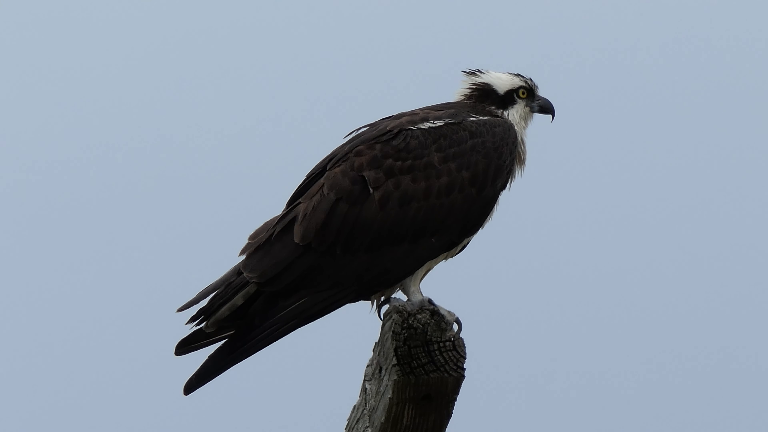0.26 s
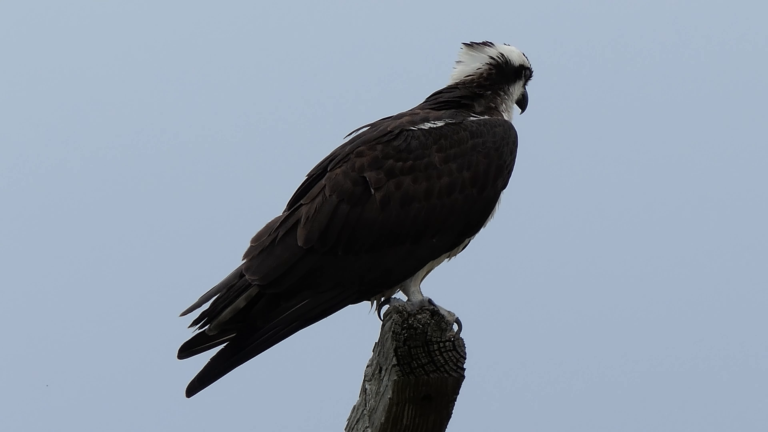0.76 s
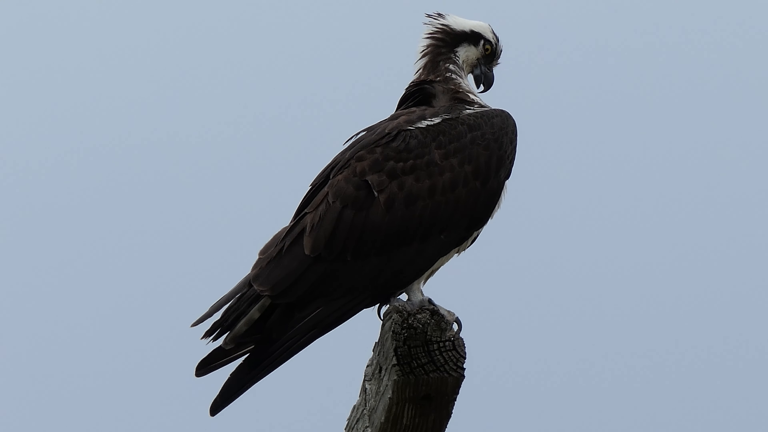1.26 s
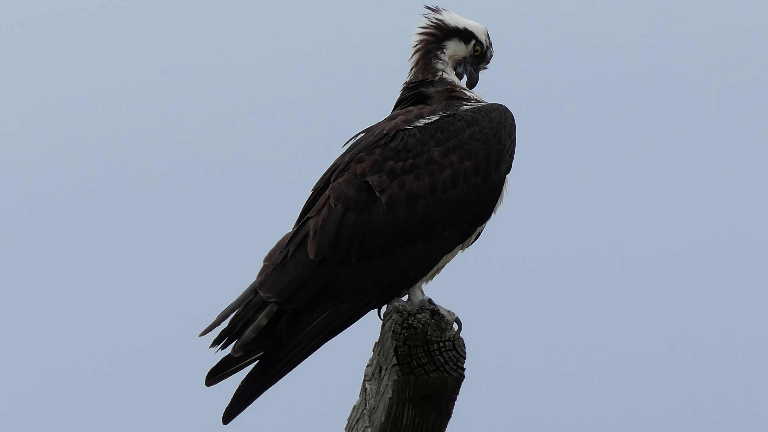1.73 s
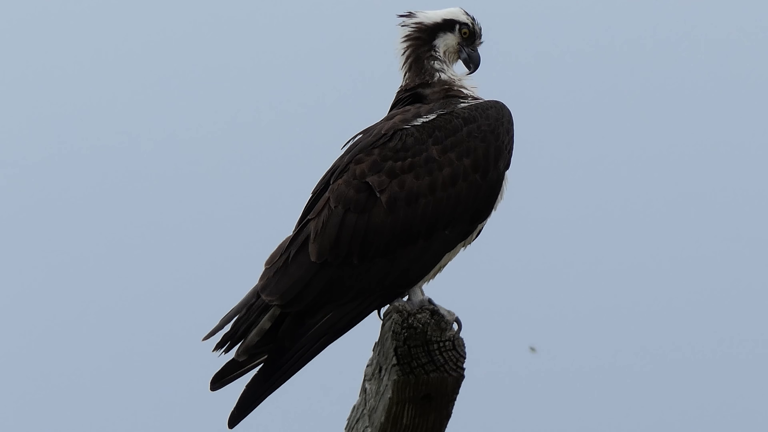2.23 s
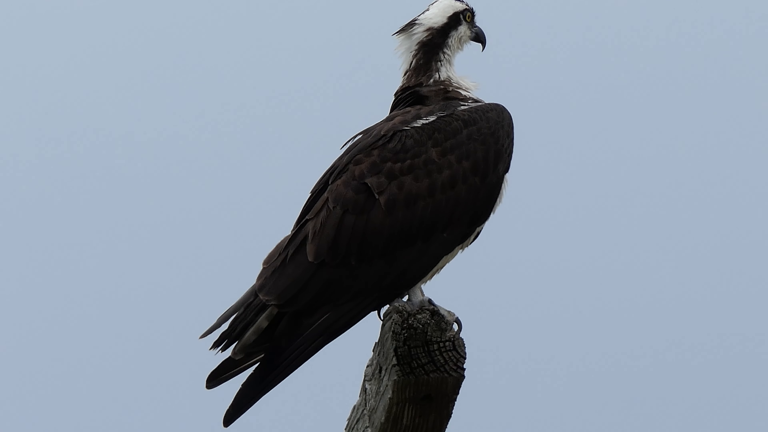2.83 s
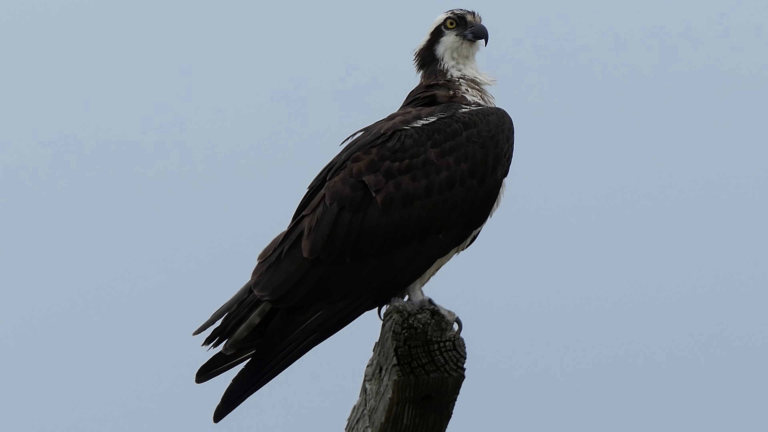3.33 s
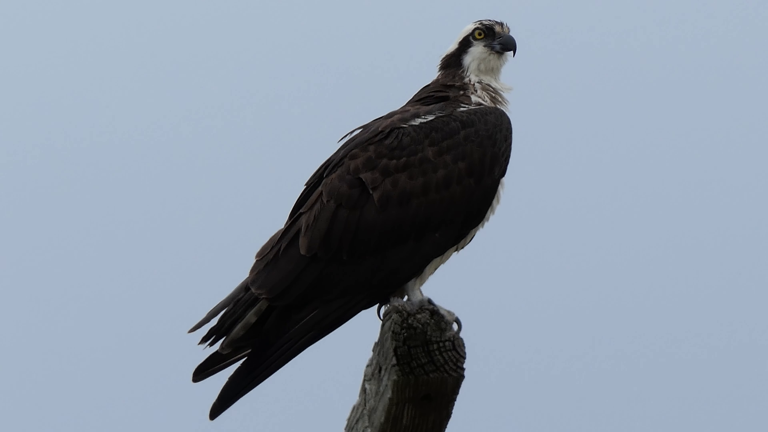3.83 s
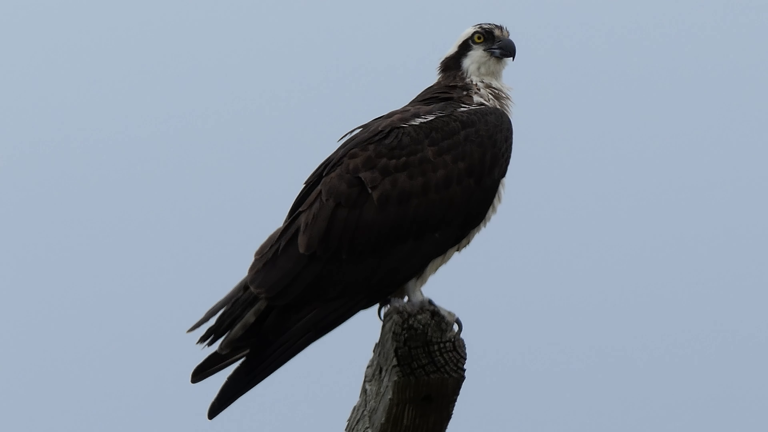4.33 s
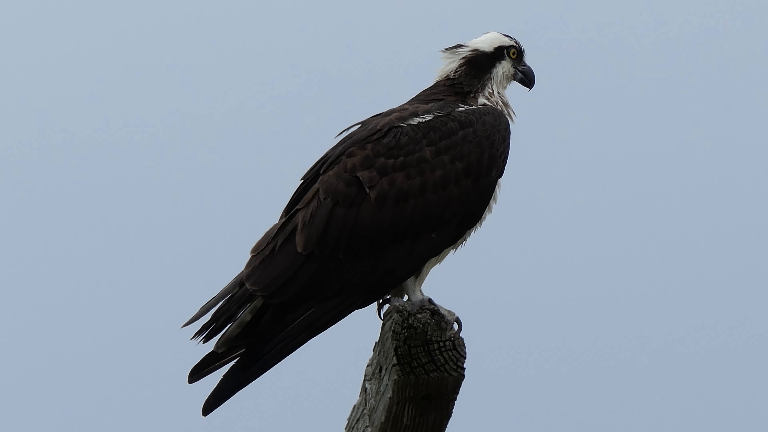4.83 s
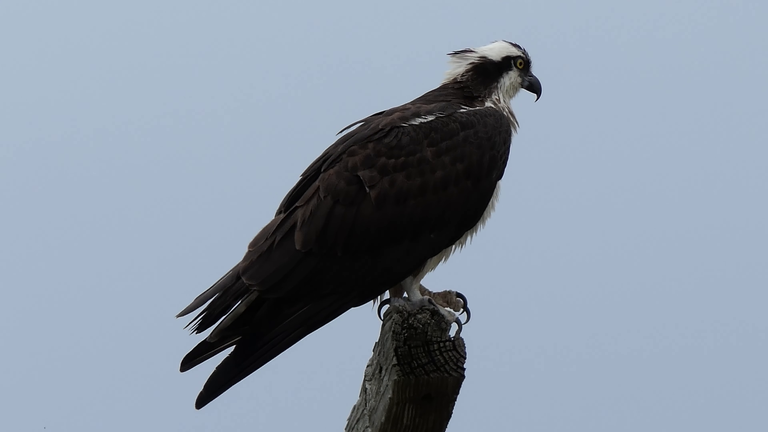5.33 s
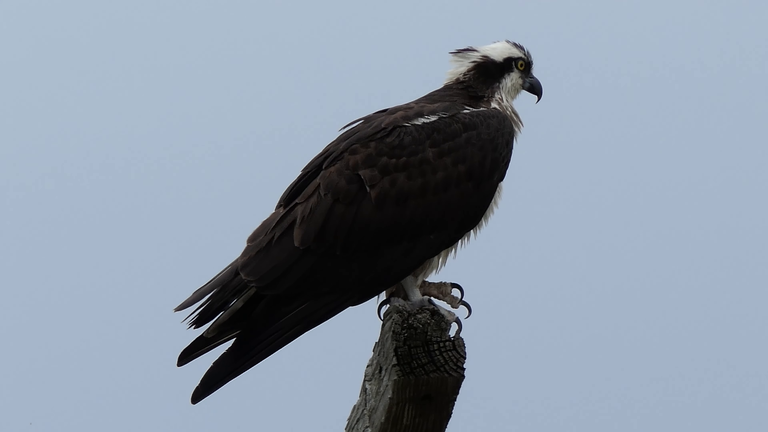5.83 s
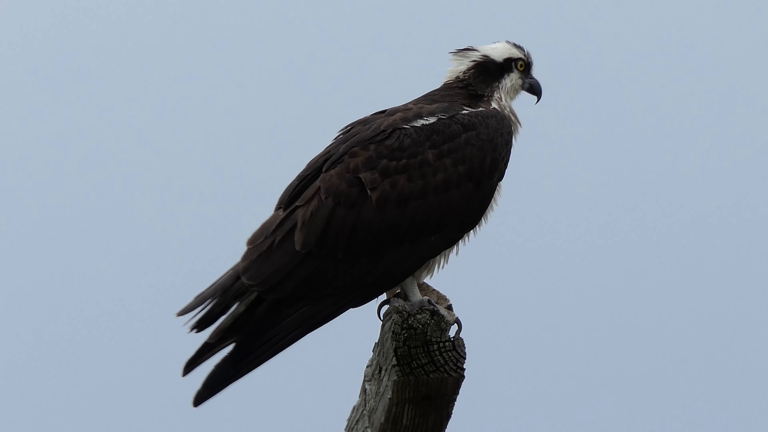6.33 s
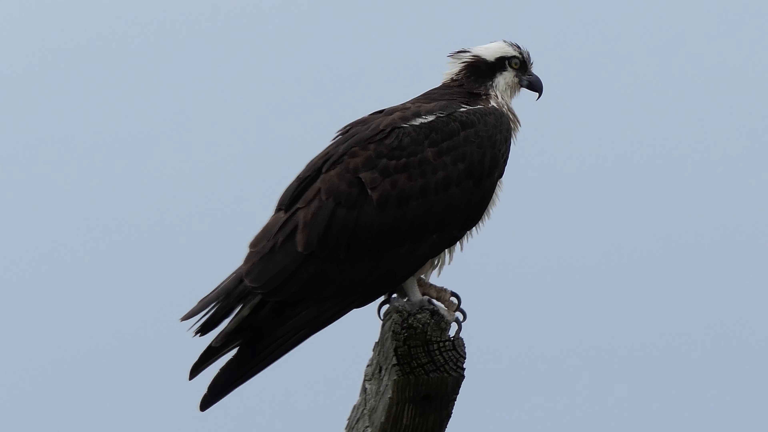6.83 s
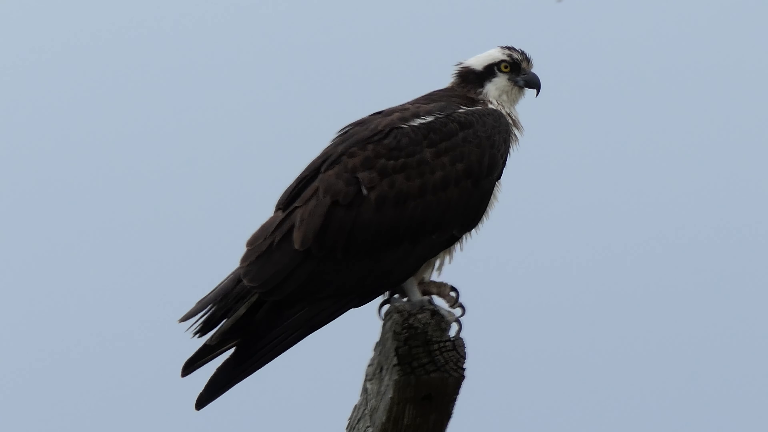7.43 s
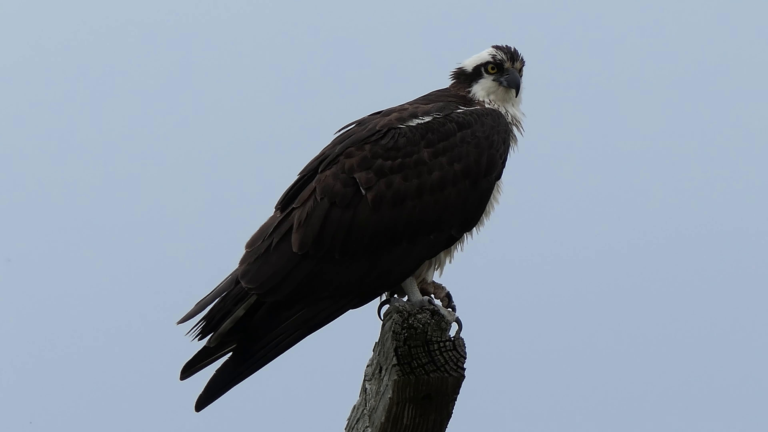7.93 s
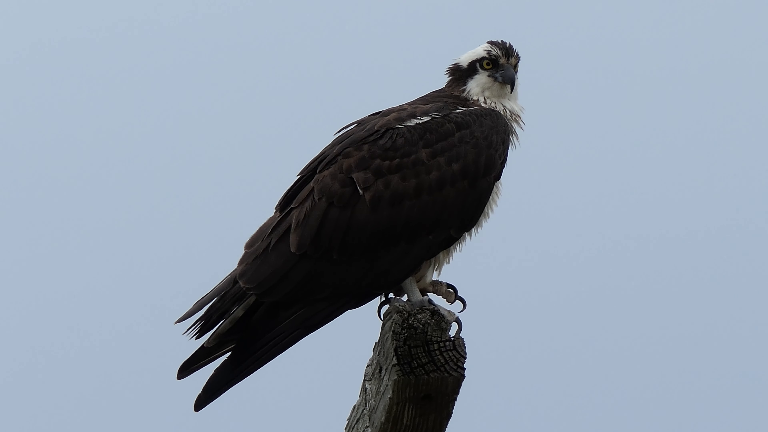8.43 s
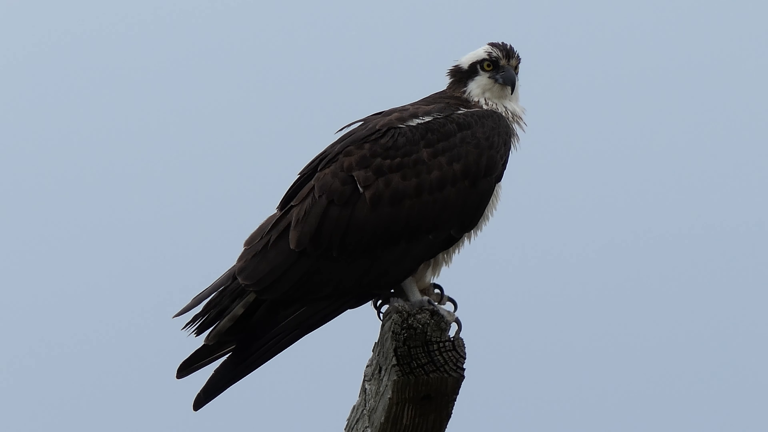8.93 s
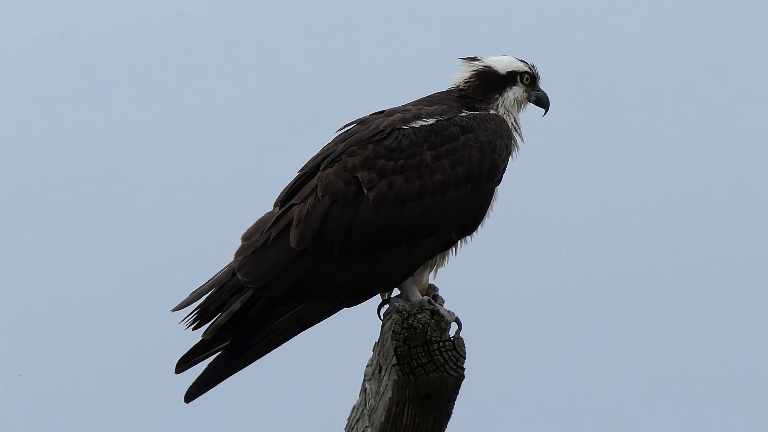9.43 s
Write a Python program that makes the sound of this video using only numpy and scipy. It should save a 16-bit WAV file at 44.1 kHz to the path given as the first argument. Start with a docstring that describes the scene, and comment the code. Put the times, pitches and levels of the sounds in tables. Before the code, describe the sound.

An osprey gives three short whistled chirps dropping in pitch, with dry chacks between, over distant machine hum and one loud steel bang.

```python
"""A large bird whistles three calls: harmonics of a gliding pitch, a quick yelp dropping to a held note.
A smaller bird adds dry chacks, pulses in rasping noise; faint sine peeps glide. The birds echo faintly.
Far off a heavy machine hums on its firing rate and sags under load. A steel part bangs: noise through
ringing resonances. Loose material rumbles down in surges of coloured noise, over low din, air and hiss."""
import sys
import numpy as np
from scipy import signal
from scipy.fft import rfft, irfft, next_fast_len
from scipy.io import wavfile
from scipy.ndimage import map_coordinates

SR = 44100
rng = np.random.default_rng(int(sys.argv[2]) if len(sys.argv) > 2 else 0)


def to_wav(sig):
    """Store sig (one row per channel, or 1-D mono) as 16-bit WAV at the path in sys.argv[1].

    Samples outside -1..1 are clipped; the rate is SR.
    """
    pcm = np.clip(np.atleast_2d(sig), -1, 1) * 32767
    pcm = np.round(pcm).astype(np.int16)
    wavfile.write(sys.argv[1], SR, pcm.T)  # frames by channels


N = 426447
TIME = np.arange(N) / SR


def from_db(db):
    """Decibels to gain."""
    return 10 ** (np.asarray(db) / 20)


def rms_one(x):
    """Scale to unit power."""
    return x / np.sqrt(np.mean(x ** 2) + 1e-20)


def in_time(rows):
    """Interpolate a (time, level) curve at every sample."""
    s, level = np.transpose(rows)
    return np.interp(TIME, s, level)


def at_hz(points, hz):
    """Read a spectrum on a log-frequency axis."""
    f, value = np.transpose(points)
    return np.interp(np.log(hz), np.log(f), value)


def step(x):
    """Smooth step from 0 to 1 around x = 0."""
    return (1 + np.tanh(x / 2)) / 2


def bell(off_hz, width_hz):
    """Bell-shaped peak, 1 at its centre."""
    return np.exp(-(off_hz / width_hz) ** 2)


def drift(rate_hz, t=TIME):
    """Random curve through rate_hz knots a second, joined by straight lines; rms 1."""
    knots = rng.standard_normal(N // 20)
    return rms_one(map_coordinates(knots, [t * min(rate_hz, SR / 21)], order=1))


def resonate(x, hz, width_hz):
    """One two-pole resonance with gain 1 on top."""
    r = np.exp(-np.pi * width_hz / SR)
    b = np.array([1, 0, -1]) * (1 - r * r) / 2
    a = [1, -2 * r * np.cos(2 * np.pi * hz / SR), r * r]
    return signal.lfilter(b, a, x + 1e-18)


def low_pass(x, hz, order):
    """Butterworth low-pass."""
    sos = signal.butter(order, min(hz, SR / 2 - 1), fs=SR, output="sos")
    return signal.sosfilt(sos, x + 1e-18)


def panned(x, left_db):
    """Place a source by its left-right level difference."""
    return x * from_db(np.array([[left_db], [-left_db]]) / 2)


# left-right correlation of diffuse sound: (frequency [Hz], likeness [-1..1])
LIKENESS = [(25, 0.18), (80, 0.98), (200, 0.9), (400, 0.86), (700, 0.72), (1500, 0.55), (3000, 0.63),
            (6000, 0.46), (10000, 0.46), (14000, .15)]


def stereo_noise(spectrum):
    """Coloured noise from all around, its two sides as alike as LIKENESS says; rms 1."""
    size = next_fast_len(N)
    hz = np.maximum(np.arange(size // 2 + 1) * SR / size, 1)
    mid, side = rfft(rng.standard_normal((2, size)))
    alike = np.clip(at_hz(LIKENESS, hz), -1, 1)
    pair = np.sqrt(1 + alike) * mid + np.sqrt(1 - alike) * side * [[1], [-1]]
    return rms_one(irfft(pair * from_db(at_hz(spectrum, hz)), size)[:, :N])


def surroundings(x, t60_s, low_hz, dull_hz):
    """Scattered echoes, different on each side; leaves and twigs throw back the short waves best."""
    t = TIME[:SR]
    band = signal.butter(2, [low_hz, dull_hz], "band", fs=SR, output="sos")
    scatter = signal.sosfilt(band, rng.standard_normal((2, SR)))
    echoes = scatter * from_db(-60 * t / t60_s) * (1 - np.exp(-t / 0.0046))
    response = rms_one(echoes) / np.sqrt(SR)
    return signal.fftconvolve(np.atleast_2d(x), response, axes=1)[:, :N]


# broadband background, moving air below, recorder hiss on top: (frequency [Hz], density [dB per Hz])
BROADBAND = [(200, -6), (480, -1), (700, 4.5), (1000, 2.5), (1500, -3), (2100, -10), (3000, -19.5),
             (4000, -29.5), (5500, -31.5), (8200, -37.5), (9800, -28.5), (12000, -33.5), (16000, -35)]
BROADBAND_DB = -50


def air_and_hiss():
    """Steady broadband background: moving air below, recorder hiss on top."""
    return from_db(BROADBAND_DB) * stereo_noise(BROADBAND)


# distant machine din: (frequency [Hz], density [dB per Hz])
DIN = [(20, -33), (40, -31), (62, -10.5), (85, 0), (100, -3.5), (125, -1), (160, -4.5), (215, -5),
       (260, -12.5), (330, -12.5), (480, -25.5), (700, -64), (1200, -100)]
DIN_DB = -42


def machine_din():
    """Steady low noise of the distant machine."""
    return from_db(DIN_DB) * stereo_noise(DIN)


# rumble of the sliding load: (frequency [Hz], density [dB per Hz])
RUMBLE = [(100, -38), (170, 5.5), (250, -4), (345, 0), (420, -7.5), (500, -20.5), (650, -9), (800, -13),
          (1300, -14.5), (2000, -23.5), (3200, -29.5), (4500, -44.5), (8000, -57)]
# surges of the slide: (peak time [s], level [dB], rise [s], die-away [s])
SURGES = [(3.3, -41.5, 0.13, 0.73), (4.95, -40, 0.7, 2.2), (7.1, -65, 0.33, 0.2)]


def sliding_load(lumpy_db=1.0):
    """Uneven rumble of loose material, sliding in surges that swell and die away."""
    flow = 0
    for s, level_db, rise_s, fall_s in SURGES:
        after = TIME - s
        decay = np.where(after < 0, (after / rise_s) ** 2, after / fall_s)
        flow = flow + from_db(level_db) * np.exp(-decay)
    return flow * from_db(lumpy_db * drift(25)) * stereo_noise(RUMBLE)


# hum on the firing rate: (time [s], level [dB])
HUM = [(0, -44), (1.1, -42), (1.6, -47.5), (3.2, -45.5), (3.7, -40.5), (4.3, -43), (7.55, -39),
       (8.1, -47.5), (9.67, -49)]
# its octave: (time [s], level [dB])
OCTAVE = [(0, -58), (5.4, -66), (6.2, -55), (8.15, -59), (8.33, -46), (9.67, -46)]
# the engine runs free, sags when the load comes on, and its governor wins a little back
FREE_HZ, LOADED_HZ, LOAD_AT_S, LOAD_TAKES_S = 126, 111.6, 3.47, 0.076
DROOP_HZ, GOVERNOR_S = 3.2, 1.5


def engine(wobble_share=0.0038, fading_db=1.0, third_below_db=-19):
    """Exhaust lines on the firing rate, which sags under load; each fades on its way through the air."""
    load = step((TIME - LOAD_AT_S) / LOAD_TAKES_S)
    droop_hz = DROOP_HZ * np.exp(-np.maximum(TIME - LOAD_AT_S, 0) / GOVERNOR_S)
    hz = (1 - load) * FREE_HZ + load * (LOADED_HZ - droop_hz)
    phase = 2 * np.pi * np.cumsum(hz * (1 + wobble_share * drift(15))) / SR
    octave_db = in_time(OCTAVE)
    out = 0
    for k, db in enumerate([in_time(HUM), octave_db, octave_db + third_below_db], 1):
        out = out + np.sqrt(2) * from_db(db + fading_db * drift(7)) * np.sin(k * phase)
    return out


# the steel's resonances: (frequency [Hz], width [Hz], level [dB])
STEEL = [(148.4, 18, -7), (200.5, 7.7, 3.5), (274, 26, 4), (357, 34, 2.5), (434, 30, -.5), (560, 49, -6),
         (653, 34, -3), (745, 46, -5), (924, 77, -6), (1048, 48, -3), (1277, 65, -6.5), (1405, 65, -6.5),
         (1590, 62, -9.5), (1810, 82, -14), (2090, 130, -17), (2600, 52, -16), (2920, 220, -26.5)]
# blows on the steel: (time [s], level [dB], contact cut-off [Hz], die-away t60 [s])
BLOWS = [(3.125, -21.5, 190, 0.31), (3.176, -19, 3500, 0.26), (4.928, -32, 175, 0.072)]


def bang(attack_s=0.03, tail_db=-14, tail_stretch=11, tail_hz=1500):
    """Dull bump, hard blow, later a faint bump; distance smears each into a rush of echoes in the steel."""
    rush = stereo_noise([(100, 0.0043), (10000, 0.0042)])  # almost white
    ringing = 0
    for k, (hz, width_hz, db) in enumerate(STEEL):
        ringing = ringing + (-1) ** k * from_db(db) * resonate(rush, hz, width_hz)
    out = 0
    for s, level_db, contact_hz, t60_s in BLOWS:
        age = np.maximum(TIME - s, 0)
        struck = rms_one(low_pass(ringing, contact_hz, order=2))
        near = struck * from_db(-60 * age / t60_s)
        rolling_db = tail_db - 60 * age / (tail_stretch * t60_s)
        rolling_echo = low_pass(struck, tail_hz, order=1) * from_db(rolling_db)
        out = out + from_db(level_db) * (1 - np.exp(-age / attack_s)) * (near + rolling_echo)
    return out


# crack of the hard blow: (frequency [Hz], density [dB per Hz])
CRACK = [(200, -30), (700, -14), (950, 2), (1150, -2), (1350, 4), (1650, -1), (1900, -21), (3000, -31),
         (4500, -60)]
CRACK_DB, CRACK_T60_S = -27.5, .15


def crack(attack_s=0.0048):
    """The hard blow's first bright burst, quickly gone."""
    age = np.maximum(TIME - BLOWS[1][0], 0)
    envelope = from_db(CRACK_DB - 60 * age / CRACK_T60_S) * (1 - np.exp(-age / attack_s)) ** 2
    return stereo_noise(CRACK) * envelope


# long ringing modes of the steel: (start [s], frequency [Hz], level [dB], t60 [s])
RINGING = [(3.215, 651, -37, 1.5), (3.215, 608, -49, 2.7), (3.176, 1200, -41.5, .45),
           (3.176, 1561, -32.5, .25)]


def steel_ring(swell_s=0.0098, wavering_db=1.5, smear_share=0.00287):
    """A few modes build up after the hard blow, the low ones last, wavering as their echoes cross."""
    out = 0
    for s, hz, level_db, t60_s in RINGING:
        age = np.maximum(TIME - s, 0)
        cycles = np.cumsum(hz * (1 + smear_share * drift(60))) / SR
        tone = np.sqrt(2) * np.sin(2 * np.pi * cycles)
        decay = from_db(level_db - 60 * age / t60_s + wavering_db * drift(30.12))
        out = out + tone * decay * (1 - np.exp(-age / swell_s))
    return out


# faint peeps; the last row is a thin rising tone within the third call:
#   (mid time [s], level [dB], length [s], pitch [Hz], fall [octaves], hoarseness [share of pitch])
PEEPS = [(2.138, -76, .045, 4030, .07, .02), (2.17, -81, .075, 4750, .04, .035),
         (2.302, -77.5, .066, 4590, -.02, .018), (2.305, -79, .07, 3680, 0, .025),
         (5.102, -75, .066, 5000, .05, .07), (5.28, -77, .072, 4800, .029, .07),
         (9.387, -76, .14, 5280, -.09, .004)]
# far falling whistles, same columns
GLIDES = [(4.105, -68, .25, 2390, .36, .004), (4.845, -65, .25, 2410, .36, .004)]


def peeps():
    """Faint peeps, falling whistles and a thin rising tone in the third call: sines of jittered pitch."""
    out, unsteady = np.zeros(N), drift(1500)
    for s, level_db, length, hz, fall, hoarse in PEEPS + GLIDES:
        on = abs(TIME - s) < length / 2
        along = (TIME[on] - s) / length
        pitch_hz = hz * 2 ** (-fall * along) * (1 + hoarse * unsteady[on])
        tone = np.sin(2 * np.pi * np.cumsum(pitch_hz) / SR)
        out[on] += from_db(level_db) * 2 * np.cos(np.pi * along) * tone
    return out


# chacks: (start [s], level [dB], length [s], pulse rate [Hz], bill resonance [Hz], its height [dB],
#   treble [dB])
CHACKS = [(1.112, -50.5, 0.038, 290, 3400, 5, -4), (1.844, -46.5, 0.033, 285, 3400, 5, -4),
          (2.634, -53, 0.031, 283, 2400, 13, -22), (3.113, -36, 0.035, 273, 3550, 12, 0),
          (3.901, -44.5, 0.032, 270, 1640, 15, -3), (4.929, -30, 0.033, 267.8, 3300, 14, -5.5),
          (6.714, -41, 0.037, 256.3, 2970, 6, -5), (7.66, -43, .027, 263, 2850, 7, -11),
          (8.543, -47, .034, 264, 2850, 9, -14)]
# rasp around the core: (frequency [Hz], density [dB per Hz])
RASP = [(700, -14), (1500, -3), (2400, -3), (3100, -1.5), (3600, -4), (4100, -12.5), (5300, -10),
        (6300, -3), (8300, -7.5), (10200, -5), (11500, -22), (14000, -22), (16000, -48)]
# voiced core, harmonics from the fourth upwards: level [dB]
CORE = [-13, -10, 2.5, -11, 4.5, -2, -2.5, 0.5, 0, -3, -3.5, -10, -26]
# core against rasp, pulse unevenness as a share of the rate, flutter of each harmonic
CORE_DB, CORE_JITTER_SHARE, CORE_FLUTTER_DB, CORE_FLUTTER_HZ = 5.5, .018, 3.2, 250


def chacks(bill_width_hz=420, bill_fall_octaves=0.33, attack_s=0.0088, spread=0.97, cut_steepness=6):
    """Short rough buzzes of uneven pulses in rasping air; the bill's resonance falls as it closes."""
    left, right = stereo_noise(RASP)
    rasp = (left + right) / 2 + spread * (left - right) / 2 * np.array([[1], [-1]])
    treble = signal.sosfiltfilt(signal.butter(4, 4600, "high", fs=SR, output="sos"), rasp)
    k = 4 + np.arange(len(CORE))[:, None]
    out = np.zeros((2, N))
    for s, level_db, length, pulse_hz, bill_hz, bill_db, treble_db in CHACKS:
        on = (TIME > s) & (TIME < s + 3 * length)
        age = TIME[on] - s
        air = rasp[:, on] + (from_db(treble_db) - 1) * treble[:, on]
        closing_hz = bill_hz * 2 ** (-bill_fall_octaves * (age / length - .5))
        flutter_db = CORE_FLUTTER_DB * np.array([drift(CORE_FLUTTER_HZ, age) for _ in k])
        resonance_db = bill_db * bell(k * pulse_hz - closing_hz, bill_width_hz)
        gain = from_db(np.array(CORE)[:, None] + flutter_db + resonance_db)
        pulses = np.cumsum(pulse_hz * (1 + CORE_JITTER_SHARE * drift(900, age))) / SR
        cycles = k * pulses + rng.random(k.shape)
        core = np.sum(gain * np.sin(2 * np.pi * cycles), axis=0)
        sounding = age < length
        burst = air + from_db(CORE_DB) * core / core[sounding].std()
        envelope = (1 - np.exp(-age / attack_s)) ** 2 / (1 + (age / length) ** cut_steepness)
        out[:, on] += from_db(level_db) * burst / burst[:, sounding].std() * envelope
    return out


SCOOP_S, SCOOP_SHARE = .020, .47
CREST_SHARE, ARCH_HZ_PER_S2 = .63, 2200
SAG_S, SAG_SHARE = .0175, .38


def call_pitch(age, length, yelp, yelp_hz, held_hz):
    """A scoop up to the yelp, a drop to the arched note, a sag at the end."""
    note_hz = held_hz - ARCH_HZ_PER_S2 * (age - CREST_SHARE * length) ** 2
    scoop = 1 - SCOOP_SHARE * np.maximum(1 - age / SCOOP_S, 0)
    sag = 1 - SAG_SHARE * np.exp((age - length) / SAG_S)
    return (yelp * yelp_hz + (1 - yelp) * note_hz) * scoop * sag


# strength: fades as the air runs out; below the grip pitch the whistle slackens, at the end it dies away
FADE_DB_PER_S, GRIP_HZ, GRIP_WIDTH_HZ = 8, 728, 7.2
SCOOP_SLACK_DB, SLACK_DB, DYING_DB_PER_S = -8.5, -9.5, 330
# colour: bright in the yelp and in a push late in the held note, dull between
PUSH_SHARE, PUSH_RISE_S, PUSH_FALL_S, RELAXED_DB = 0.7, 0.045, 0.041, -7
# the third harmonic leaps out once the scoop has reached the yelp
THIRD_RISE_S, YELP_OPENS_S = 0.045, 0.016
HELD_TOP_DB = -6  # held note, above the sixth harmonic
JITTER_SHARE = .0008
# beak resonance of the sound sent all round, the same in every call
ALL_ROUND_HZ, ALL_ROUND_WIDTH_HZ = 5020, 630
# the caller's throat: (frequency [Hz], level [dB])
THROAT = [(800, -29), (1300, -24), (1540, -4.5), (1660, -5), (2020, -3.5), (2300, -17), (2550, -26.5),
          (3000, -24.5), (3400, -31.5), (3900, -26), (4250, -31), (4850, -46.5), (5100, -35.5), (5800, -35),
          (6700, -46), (7500, -43), (11000, -58)]
# calls: (start [s], length [s], yelp length [s], drop from the yelp [s], yelp pitch [Hz], held pitch [Hz],
#   level [dB], hollowness of yelp [dB], its third harmonic [dB], brightness of yelp [dB], of held note [dB],
#   held third harmonic [dB], its gain in the push [dB], beak resonance in yelp [Hz], in held note [Hz],
#   its height [dB], its width [Hz], height of the all-round resonance [dB], left-right level [dB])
CALLS = [(1.072, 0.3, 0.055, 0.0039, 1009, 859, -33.5, -1, 12, -5, -2, 3, 7, 4170, 4450, 14.5, 680, 14.5, 2),
         (6.377, 0.29, 0.051, 0.0066, 992, 837.4, -36, -10, 16, 12.5, 6.5, -6, 17, 4750, 4980, 21, 480, 12, -1.5),
         (9.267, .306, .053, 0.0055, 986, 838, -35, -7, 13, 2, -3, -3.5, 0.5, 4970, 4700, 16.5, 400, 14, 3)]


def whistle(start, length, yelp_s, drop_s, yelp_hz, held_hz, level_db, hollow_db, yelp_third_db,
            yelp_bright_db, held_bright_db, held_third_db, third_push_db, yelp_beak_hz, held_beak_hz,
            beak_db, beak_width_hz, all_round_db, break_jitter=0.022, flutter_db=1.8, edge_s=0.0011,
            rasp_db=-33, sag_dull_db=-15, count=12):
    """Harmonics sweep the throat, the second on its main resonance; effort lifts the upper ones.
    Two rows: sound towards the listener, coloured by how the beak is held, and sound sent all round."""
    on = (TIME > start) & (TIME < start + length)
    age = TIME[on] - start
    yelp = step((yelp_s - age) / drop_s)
    held = 1 - yelp
    opened = step((age - YELP_OPENS_S) / 0.0027)
    pitch_hz = call_pitch(age, length, yelp, yelp_hz, held_hz)
    late = age - PUSH_SHARE * length
    push = np.exp(-(late / np.where(late < 0, PUSH_RISE_S, PUSH_FALL_S)) ** 2)
    third_push = np.exp(-(late / np.where(late < 0, THIRD_RISE_S, PUSH_FALL_S)) ** 2)
    slack = step((GRIP_HZ - pitch_hz) / GRIP_WIDTH_HZ)

    # the voice rasps where it breaks between registers
    sliding = np.minimum(abs(np.gradient(pitch_hz)) * SR / 7000, 1)
    pitch_hz = pitch_hz * (1 + JITTER_SHARE * drift(300, age) + break_jitter * sliding * drift(1200, age))
    k = np.arange(1, count + 1)[:, None]
    hz = k * pitch_hz

    beak_hz = yelp * yelp_beak_hz + held * held_beak_hz
    towards_db = beak_db * bell(hz - beak_hz, beak_width_hz)
    around_db = all_round_db * bell(hz - ALL_ROUND_HZ, ALL_ROUND_WIDTH_HZ) * held

    third_db = yelp * yelp_third_db + held * (held_third_db + third_push_db * third_push)
    third_db = opened * (1 - slack) * third_db
    dull = np.maximum(np.maximum(slack, 1 - opened), sliding * (late > 0))
    held_upper_db = held_bright_db + RELAXED_DB * (1 - push)
    upper_db = yelp * yelp_bright_db + held * held_upper_db + sag_dull_db * dull
    effort_db = hollow_db * yelp * (1 - sliding) * (k == 2) + third_db * (k == 3)
    effort_db = effort_db + upper_db * (k > 3) + HELD_TOP_DB * held * (k > 6)
    # high partials waver most
    unsteady_db = flutter_db * k / 5 * np.array([drift(67.6, age) for _ in k])

    gain = from_db(at_hz(THROAT, hz) + effort_db + unsteady_db)
    partials = gain * np.sin(2 * np.pi * k * np.cumsum(pitch_hz) / SR)
    voice = np.sum([partials * from_db(towards_db), partials * from_db(around_db)], axis=1)
    breath = resonate(rng.standard_normal(len(pitch_hz)), 2300, 3500)
    rasp = from_db(rasp_db) * sliding * rms_one(low_pass(breath, 9800, order=2))

    edges = np.clip(np.minimum(age, length - age) / edge_s, 0, 1)
    dying_db = DYING_DB_PER_S * np.cumsum(slack * (late > 0)) / SR
    slack_db = slack * np.where(late < 0, SCOOP_SLACK_DB, SLACK_DB)
    strength_db = level_db - FADE_DB_PER_S * age - dying_db + slack_db
    out = np.zeros((2, N))
    out[:, on] = (np.sqrt(2) * voice + rasp) * edges * from_db(strength_db)
    return out


def scene():
    """Birds with their faint echoes over the working machine."""
    background = sliding_load() + machine_din() + air_and_hiss()
    steel = bang() + crack() + steel_ring()
    machine = panned(engine(), left_db=-1.5) + panned(steel, left_db=0.0)
    chacks_and_peeps = panned(chacks(), left_db=1.5) + peeps()
    facing, all_round = 0, 0
    for *call, left_db in CALLS:
        towards, around = whistle(*call)
        facing = facing + panned(towards, left_db)
        all_round = all_round + around
    sent = all_round + from_db(-10.5) * chacks_and_peeps
    echoes = from_db(-13.5) * surroundings(sent, t60_s=1.4, low_hz=2000, dull_hz=8100)
    return facing + chacks_and_peeps + echoes + machine + panned(background, left_db=-0.53)


CUTOFF_HZ = 15650


def record(dry):
    """Steep elliptic low-pass cuts the top."""
    sos = signal.ellip(10, .1, 80, CUTOFF_HZ, fs=SR, output="sos")  # ripple, stop-band [dB]
    return signal.sosfilt(sos, dry)


dry = scene()
out = record(dry)
to_wav(out)
```